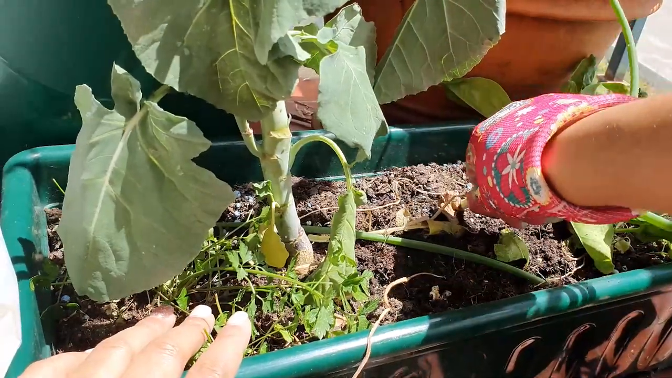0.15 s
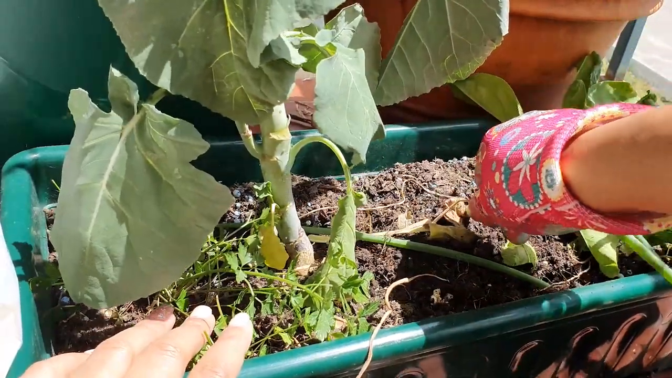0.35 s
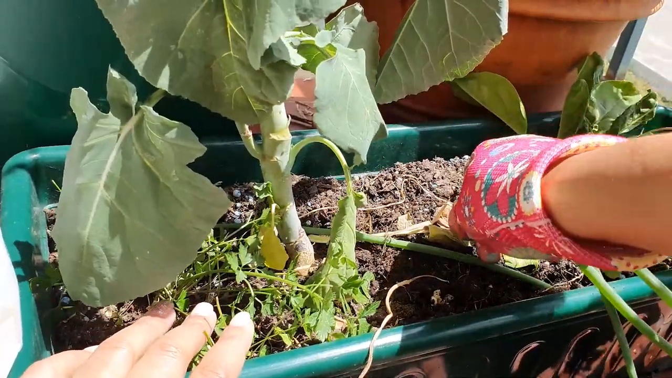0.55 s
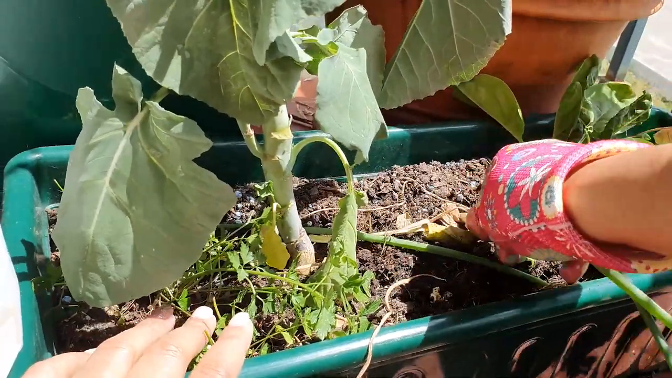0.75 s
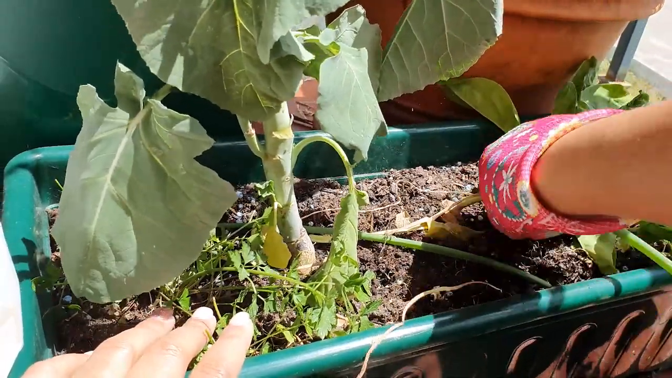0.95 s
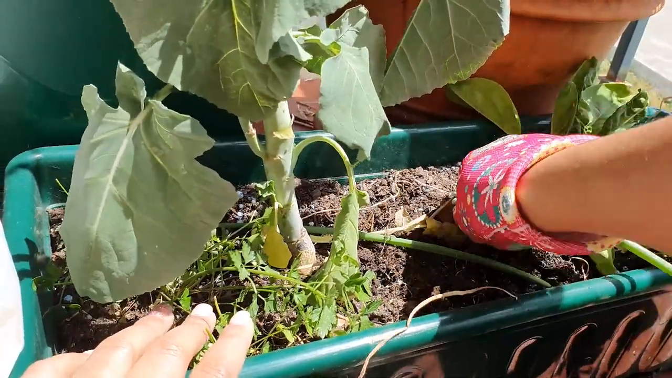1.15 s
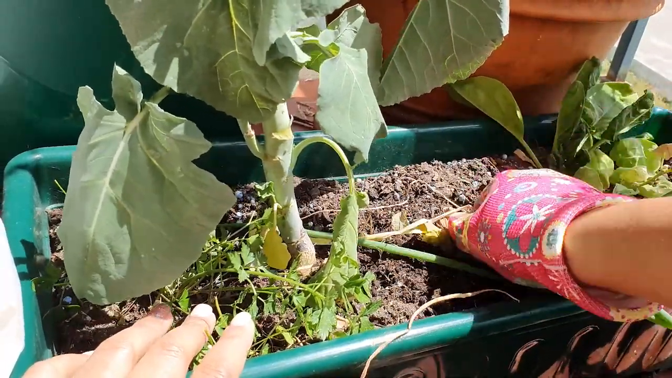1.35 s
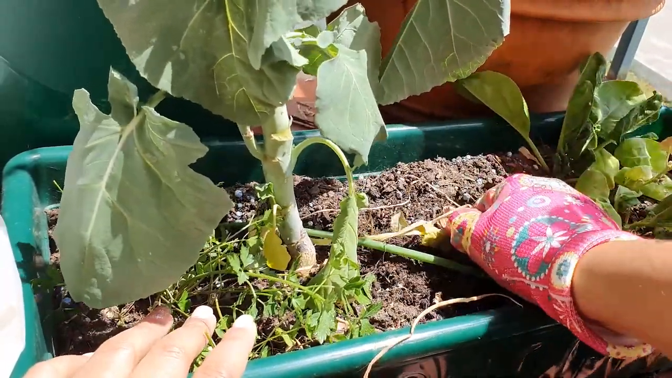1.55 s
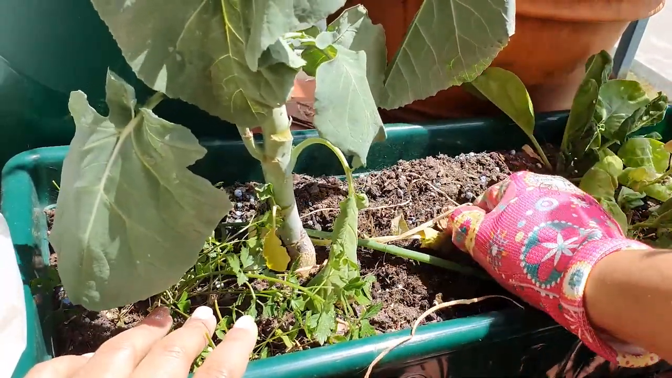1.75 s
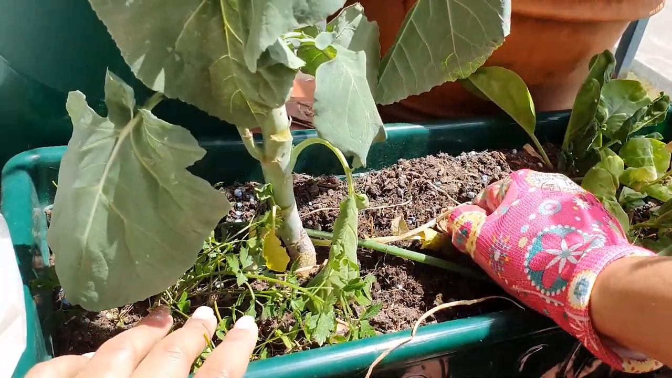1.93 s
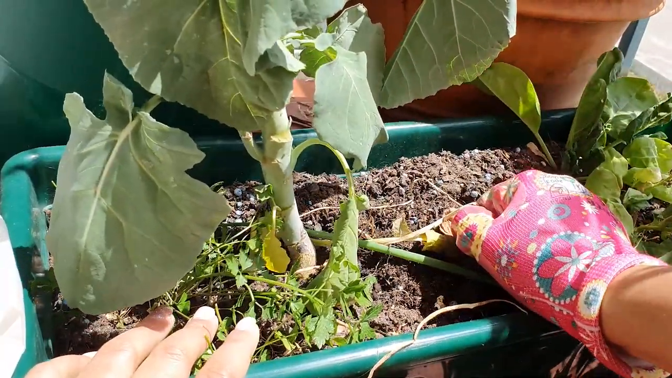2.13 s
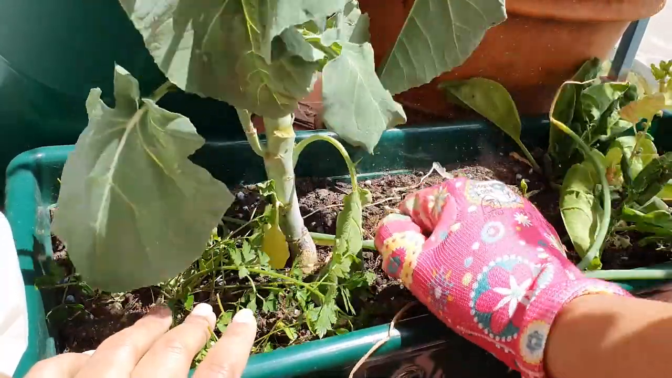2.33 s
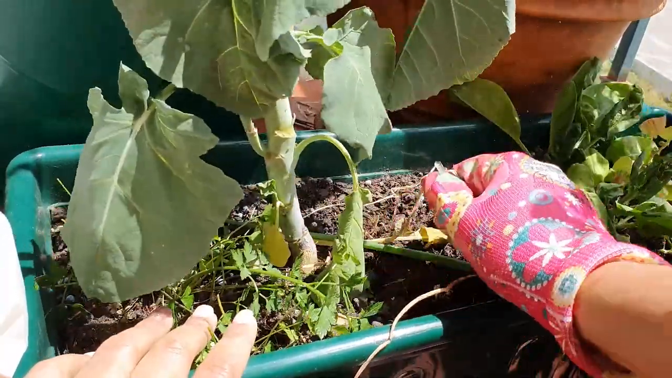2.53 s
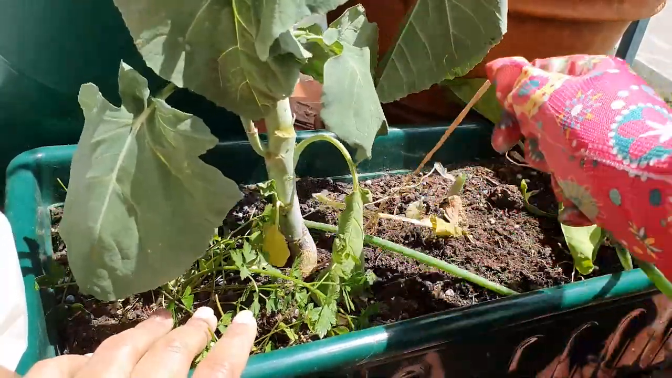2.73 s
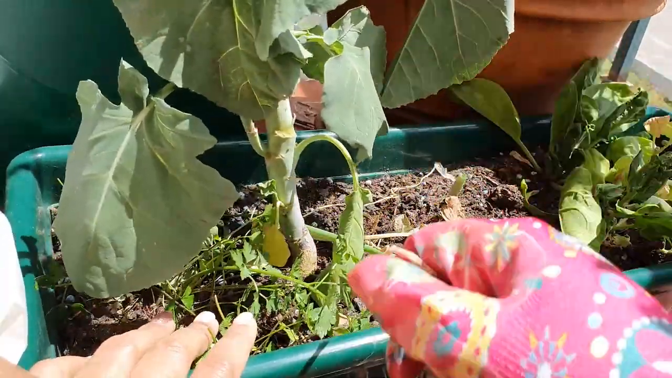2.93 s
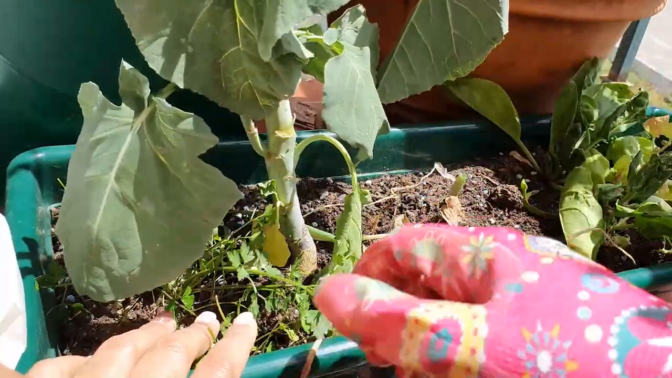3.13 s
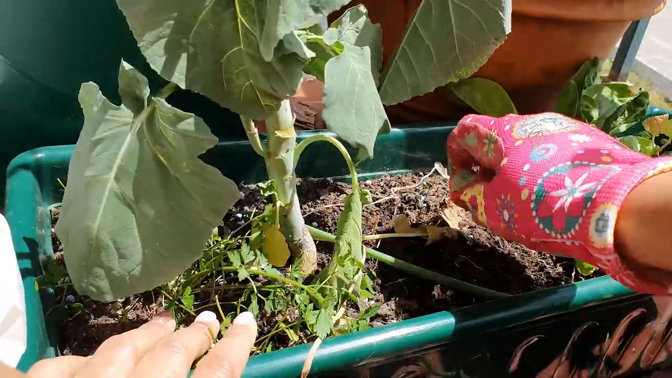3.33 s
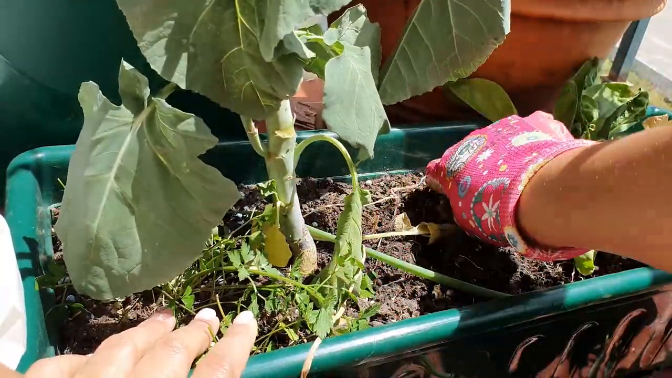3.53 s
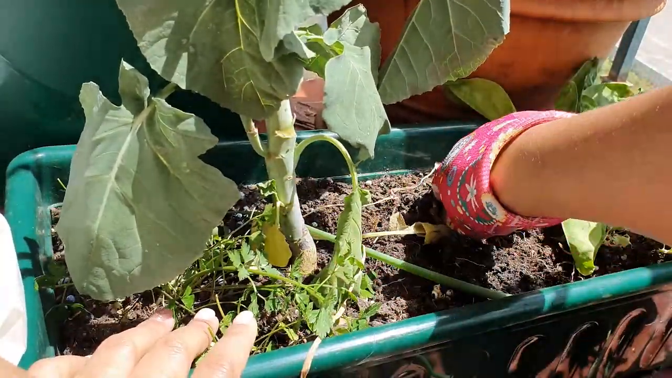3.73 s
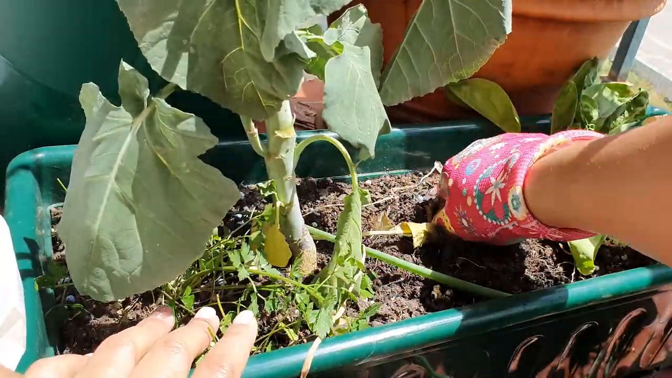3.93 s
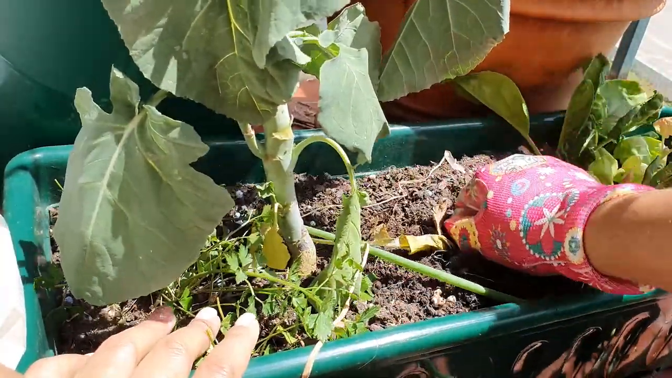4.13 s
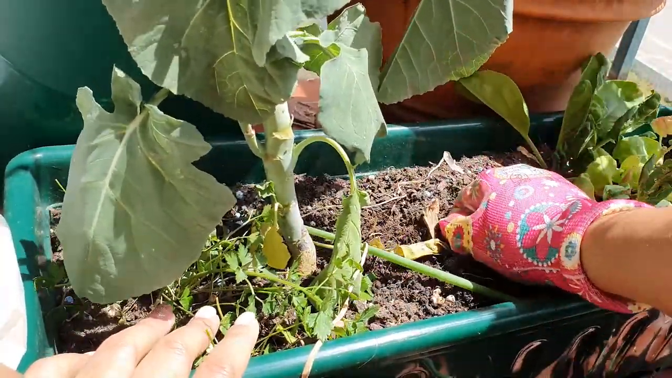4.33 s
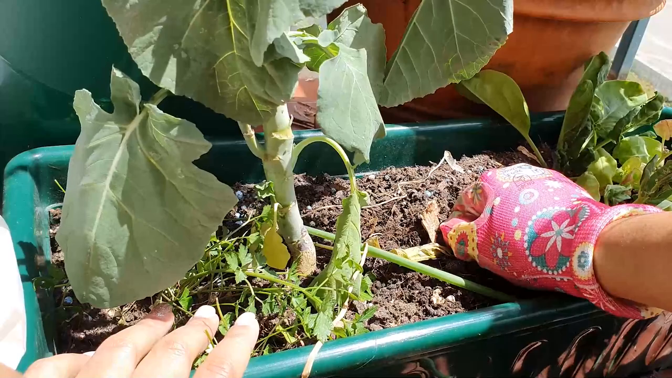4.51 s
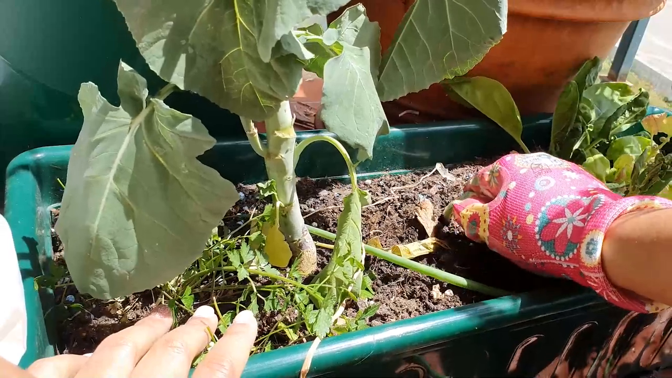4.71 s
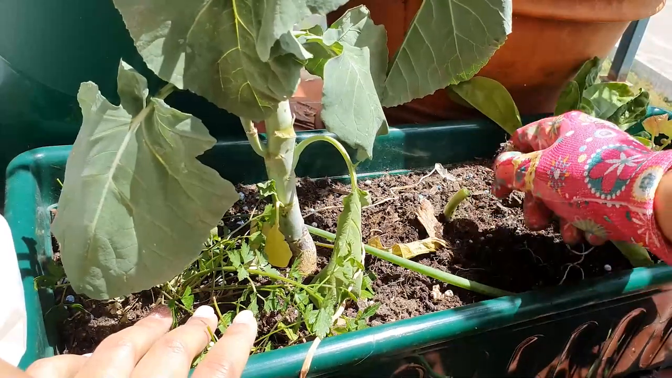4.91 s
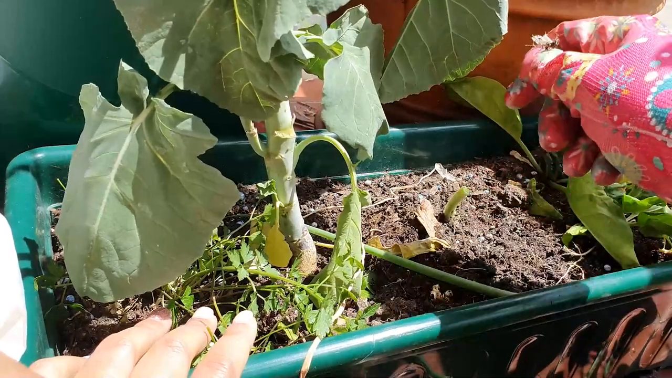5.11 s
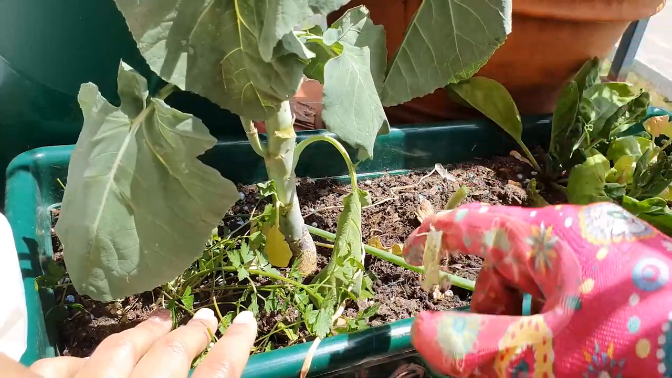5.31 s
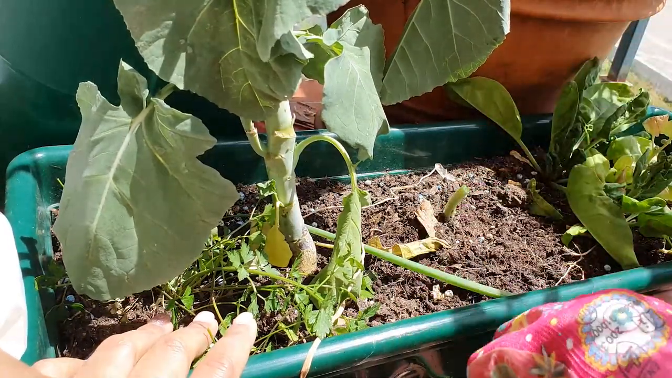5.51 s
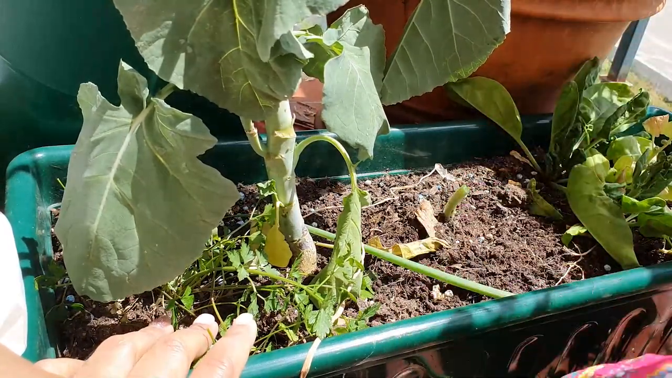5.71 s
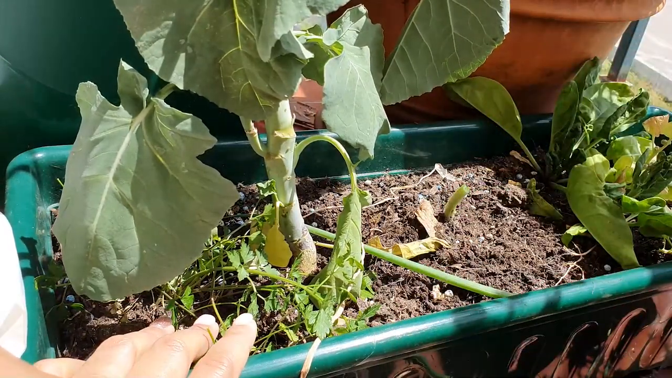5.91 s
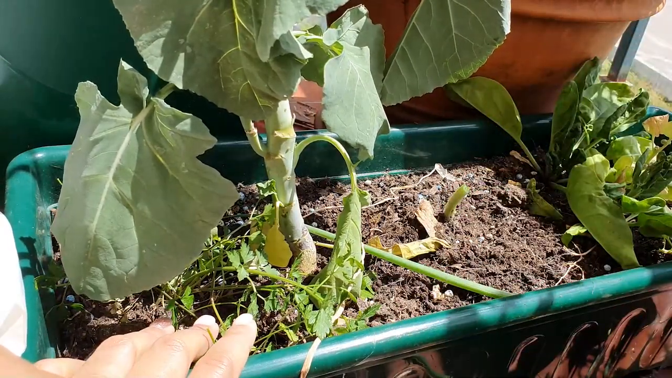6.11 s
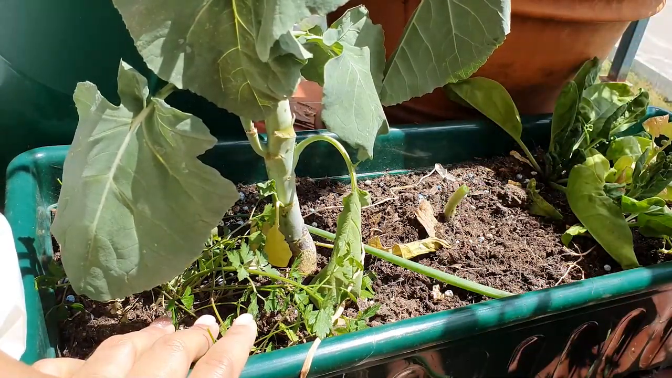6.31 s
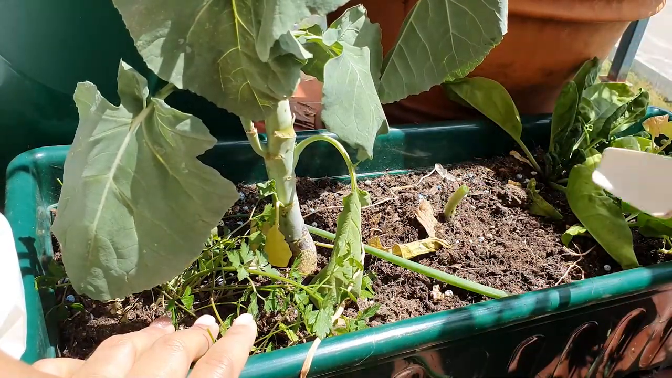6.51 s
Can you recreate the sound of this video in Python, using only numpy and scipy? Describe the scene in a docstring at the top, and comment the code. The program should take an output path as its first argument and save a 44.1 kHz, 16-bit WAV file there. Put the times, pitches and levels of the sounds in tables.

```python
"""From the start a gloved hand rubs soil and dry litter in a plastic planter: clumps of tiny noise grains.
Air rumbles as low noise, and small breaks tick as noise bursts, amid gliding sparrow whistles.
A sharp snap and recoiling stems, made as fading swings, come next; then a dove coos in slow glides.
A stalk then snaps and tears out with a thud in a run of grains; the planter rings and walls echo.
The glove squeaks in wavering whistles, twigs break later, and the dove calls again near the end."""
import sys
import numpy as np
from scipy import signal
from scipy.fft import rfft, irfft
from scipy.io import wavfile

SR = 44100
rng = np.random.default_rng(int(sys.argv[2]) if len(sys.argv) > 2 else 0)


def store_pcm(level_fs):
    """Save levels as 16-bit WAV."""
    pcm = np.round(np.clip(level_fs, -1, 1) * 32767).astype(np.int16)
    wavfile.write(sys.argv[1], SR, np.atleast_2d(pcm).T)


N = 289296
TIME = np.arange(N) / SR  # seconds

# Levels in the tables are before the mixing gains used in the functions.
# strokes of the hand: [start t/s, length/s, soil level/dB, scraping level/dB, litter level/dB]
HAND_STROKES = [(0.0, .11, -48, -49, -48), (0.144, 0.27, -57, -58, -56), (0.411, 0.12, -54.5, -56, -51),
                (0.558, 0.27, -59.5, -59, -64), (0.713, 0.12, -50.5, -51, -49.5),
                (0.848, 0.12, -50.5, -53, -59.5), (1.077, 0.26, -58.5, -54, -56),
                (1.33, 0.21, -55, -60, -60), (1.525, 0.23, -59, -61.5, -70),
                (1.717, 0.43, -57.5, -61.5, -65.5), (2.293, 0.093, -46, -57.5, -61.5),
                (2.412, 0.08, -53, -58.5, -63.5), (3.038, 0.27, -78, -72, -65.5),
                (3.448, 0.25, -59.5, -63.5, -68), (3.785, 0.27, -59.5, -62, -66),
                (3.983, 0.2, -55.5, -60.5, -65), (4.203, 0.36, -61, -68, -74),
                (4.478, 0.41, -59.5, -61, -66.5), (5.195, .10, -58, -62, -65),
                (5.497, 0.052, -67, -55.5, -55.5), (5.619, 0.01, -81, -61, -52),
                (5.74, .02, -68, -61.5, -66.5), (5.809, 0.068, -61.5, -60.5, -62),
                (6.024, 0.12, -58, -60, -65), (6.191, 0.15, -65, -65, -62),
                (6.412, 0.11, -66.5, -67.5, -72)]
# a stroke builds up over this share of its length, holds, then dies away
STROKE_ATTACK_SHARE, STROKE_RELEASE_S = 0.28, 0.056
# soil and leaves keep settling between strokes: [soil level/dB, scraping level/dB, litter level/dB]
SETTLING_LEVELS = (-67, -72, -78)
SOIL_DB, SCRAPE_DB, LITTER_DB = 4, 2.5, 3
# where the glove rubs, positive is left: [t/s, left-right level/dB]
HAND_SIDE = [(0, -6), (0.12, -12), (0.2, -0.5), (3.3, 0), (5.4, -1), (5.6, 4), (5.8, 0.5), (6.56, 0)]
# tone of rubbed soil: [f/Hz, level per Hz/dB]
SOIL_SPECTRUM = [(120, 4.5), (250, 3.5), (450, 3), (700, -3), (1050, -1.5), (1500, -11.5), (2200, -20.5),
                 (4000, -35)]
# tone of the glove scraping leaves: [f/Hz, level per Hz/dB]
SCRAPE_SPECTRUM = [(900, -25.5), (1500, -0.5), (2000, -3), (2400, -1.5), (2900, -2), (3600, -2.5),
                   (5000, -14), (7000, -17.5), (10000, -25)]
# tone of crackling dry litter: [f/Hz, level per Hz/dB]
LITTER_SPECTRUM = [(1500, -30), (2700, 0.5), (4000, 9), (6300, 5), (7800, -3.5), (10000, 0), (13000, -5.5),
                   (15000, -10), (16000, -20.5)]
# how alike left and right are: [f/Hz, likeness from -1 to 1]
STEREO_LIKENESS = [(30, 0.17), (90, 1), (170, 0.91), (350, 0.87), (700, 0.31), (1400, -0.27), (2500, 0.12),
                   (16000, -0.046)]

# light air on the microphone: [t/s, level/dB]
AIR_STRENGTH = [(0, -44), (0.9, -39), (1.2, -56), (2.5, -52), (2.65, -75.5), (3.1, -56), (3.8, -61.5),
                (4.6, -49.5), (6.56, -51.5)]
# puffs of air on top of it: [start t/s, length/s, level/dB, left-right level/dB]
AIR_PUFFS = [(0.0, 0.041, -45, 7), (0.148, 0.034, -40, 12), (0.286, 0.075, -37, 9),
             (0.394, 0.22, -32.5, 14.5), (0.714, .10, -32.5, 9.5), (1.388, 0.11, -39.5, 13),
             (2.233, 0.13, -41.5, 4), (2.95, 0.045, -46, 5), (3.175, 0.024, -42, 7),
             (4.389, 0.048, -44.5, 13), (5.049, 0.076, -39, 13), (5.25, 0.053, -49, 7),
             (6.382, 0.16, -44.5, -8)]
# tone of the air rumble: [f/Hz, level per Hz/dB]
RUMBLE_SPECTRUM = [(20, -14), (40, -3), (60, 8.5), (85, 1.5), (130, -8), (220, -16.5), (500, -61)]
# tone of the steady hush outdoors: [f/Hz, level per Hz/dB]
OUTDOOR_SPECTRUM = [(20, -32), (50, 0.5), (62, 3), (100, -11.5), (200, -6.5), (300, -24.5), (450, -18),
                    (1000, -26), (2000, -41), (3200, -26.5), (4200, -28.5), (5200, -30), (8000, -45.5),
                    (15000, -52)]
PUFF_ATTACK_SHARE, PUFF_RELEASE_S = 0.4, 0.027
AIRFLOW_PAN_DB, BREEZE_DB, OUTDOORS_DB = 4.5, -0.5, -54.5

# stalks, twigs and crumbs breaking: [t/s, level/dB, woody body level/dB, sharp edge level/dB]
BREAKS = [(0.0908, -46, 6, -3), (0.1757, -41, -3.5, -8.5), (0.4957, -21.5, -16, -6.5),
          (0.707, -44, -2.5, -1.5), (0.7237, -38.5, -10, -5), (0.7564, -40, 0, 0), (0.7695, -44, 4, 0),
          (0.7945, -38, 6, -2.5), (0.899, -46.5, 3, -12), (1.7902, -44.5, -15, -5.5),
          (1.8187, -42.5, -7, -7.5), (1.854, -45.5, 1, 0.5), (1.9378, -47, -5, -4), (2.01, -46.5, -3, -7),
          (2.2089, -17, -5.5, -10), (2.2536, -21.5, 7, -5.5), (2.271, -20, -5, -10),
          (2.2782, -27, 3, -22.5), (2.289, -21, -9, -9.5), (2.3129, -35, 7, -3), (3.13, -49.5, -14, -11),
          (3.2006, -35, -14, 4), (3.3185, -42, -4.5, 2), (4.131, -42, -2.5, -3.5), (4.6534, -43, 13.5, -3),
          (4.6704, -27, 7.5, -0.5), (4.7395, -38, 4, -11), (5.261, -37.5, -11, -17),
          (5.51, -44.5, -2.5, -15.5)]
CRACK_T60_S, CRACK_PAN_DB = 0.025, 1  # time to fade by 60 dB; shift to the left of the hand
# echoes off the planter walls and the pot behind: [delay/s, level/dB]
NEAR_WALLS = [(.0009, -24.5), (.0023, -27.5), (.0058, -19)]
# ringing tones of the plastic planter: [f/Hz, level/dB, time to fade by 60 dB/s]
PLANTER_TONES = [(186.6, -3, 0.13), (296, -10, 0.26), (424, -7, 0.2), (639, -4, 0.19), (970, -6.5, 0.053),
                 (1220, -14.5, 0.029), (1640, -14.5, 0.066), (2160, -16.5, 0.2), (2490, -14, 0.17)]
TERRACE_DB, TERRACE_T60_S = -16.5, 0.25
FAR_WALL_S, FAR_WALL_DB = 0.087, -19

# the nearer sparrows: [t/s, start f/Hz, end f/Hz, level/dB]
SPARROW_CHIRPS = [(0.1, 3850, 4710, -45.5), (0.55, 4750, 3970, -49.5), (0.6, 3610, 3710, -47.5),
                  (0.931, 3150, 2966, -53.5), (0.97, 3210, 4380, -52), (1.611, 3220, 3290, -49.5),
                  (1.64, 3900, 4126, -44.5), (3.336, 3775, 3620, -51), (3.421, 4100, 4320, -53),
                  (3.97, 3090, 3546, -51), (4.06, 3180, 4080, -48), (4.13, 4500, 4410, -50),
                  (4.31, 4280, 3990, -50), (4.355, 3820, 3440, -50.5), (4.784, 4180, 4444, -46.5),
                  (4.83, 3490, 3300, -51), (5.119, 4700, 4690, -61.5), (5.8, 3230, 3765, -48.5),
                  (5.82, 4710, 4440, -55), (5.87, 3500, 3710, -57.5), (6.18, 4410, 3550, -55.5),
                  (6.439, 3830, 3570, -55.5), (6.52, 5180, 5500, -60)]
CHIRP_S = 0.045
# replies from the flock: longest wait, pitch scatter as a share, level against the chirp
REPLY_WITHIN_S, REPLY_SCATTER, REPLY_DB = 0.095, 0.2, -10.5

# stems and root ball recoiling: [t/s, height of swing/dB, f/Hz]
STEM_RECOILS = [(0.5, -27.5, 294), (0.7942, -10, 190), (0.795, -14.5, 328), (0.928, -32.5, 387),
                (1.718, -28.5, 230), (1.937, -30.5, 340), (2.01, -34, 345), (2.209, -3, 2700),
                (2.2119, -9.5, 210), (2.2452, -13.5, 1340), (2.2468, -2.5, 1980), (2.2525, -5, 1020),
                (2.2565, 0, 245), (2.2575, -10, 480), (2.2693, -13, 334), (2.27, -3.5, 3236),
                (4.289, -38.5, 456), (4.6703, -21, 1050), (4.6708, -14.5, 2130), (4.672, -24, 243)]
# thin, high stems stop sooner: fade time at 1 kHz and how fast it falls with pitch
RECOIL_T60_S, RECOIL_T60_SLOPE = 0.015, 0.4

# dove coos: [t/s, length/s, start f/Hz, end f/Hz, level/dB]
DOVE_COOS = [(0.95, 0.23, 387, 360, -68), (1.8, 0.24, 379.5, 387, -63.5), (6.0, 0.089, 411.5, 375, -59),
             (6.05, 0.14, 364.5, 382, -57)]

# roots tearing and short scuffs of the glove: [t/s, length/s, level/dB]
ROOT_TEARS = [(2.201, 0.086, -28), (2.265, 0.036, -21.5), (2.296, 0.04, -39), (4.648, 0.02, -32),
              (5.498, 0.031, -49), (5.627, 0.041, -45.5)]
# tone of tearing roots: [f/Hz, level per Hz/dB]
ROOT_SPECTRUM = [(150, -1), (400, 0), (650, -7), (1000, -3), (1500, -6.5), (2200, -1.5), (3200, -3.5),
                 (4500, -13.5), (6500, -12), (8000, -20.5), (16000, -16.5)]

# the glove squeaks on stems: [t/s, length/s, start f/Hz, end f/Hz, level/dB]
GLOVE_SQUEAKS = [(3.49, 0.23, 2016, 1950, -65), (5.505, 0.032, 2262, 2232, -53.5),
                 (5.62, 0.058, 2130, 2065, -52.5)]

CUTOFF_HZ = 15900


def from_db(db):
    """Turn decibels into gain."""
    return 10 ** (np.asarray(db) / 20)


def rms_one(x):
    """Scale a sound to an average power of one."""
    return x / np.sqrt(np.mean(x ** 2) + 1e-20)


def in_time(rows):
    """Read each column of a curve at every sample."""
    s, *columns = np.transpose(rows)
    return [np.interp(TIME, s, column) for column in columns]


def at_hz(points, hz):
    """Read a curve at any pitch, with pitch spaced as the ear hears it."""
    point_hz, values = np.transpose(points)
    return np.interp(np.log(hz + 1), np.log(point_hz), values)


def band(x, low_hz, high_hz, order=2):
    """Keep only the sound between two pitches."""
    edges = [low_hz, min(high_hz, 0.45 * SR)]
    sos = signal.butter(order, edges, "band", fs=SR, output="sos")
    return signal.sosfilt(sos, x + 1e-18)


def add(out, s, sound):
    """Mix a short sound in at time s."""
    start = min(max(round(s * SR), 0), N)
    out[..., start:start + sound.shape[-1]] += sound[..., :N - start]


def delayed(x, s):
    """Give the same sound s seconds later."""
    return np.pad(x, [(0, 0), (round(s * SR), 0)])[:, :N]


def panned(db):
    """Give left and right gains for a level difference; positive is left."""
    return from_db(db * np.array([[0.5], [-0.5]]))


def drift(rate):
    """Wander smoothly by chance, with a new target rate times a second."""
    return rms_one(np.interp(TIME * rate, np.arange(N), rng.standard_normal(N)))


def envelope(s, length, attack_share, release_s):
    """Rise from time s, hold until the length is over, then die away."""
    t = TIME - s
    rise = np.clip(t / (length * attack_share), 0, 1)
    return rise * np.exp(-np.maximum(t - length, 0) / release_s)


def colour(pair, spectrum):
    """Shape two unrelated signals into stereo with a given tone and likeness, at rms 1."""
    hz = np.arange(N // 2 + 1) * SR / N
    alike = np.clip(at_hz(STEREO_LIKENESS, hz), -1, 1)
    mid, side = rfft(pair) * from_db(at_hz(spectrum, hz))
    opposite = [[1], [-1]]
    return rms_one(irfft(np.sqrt(1 + alike) * mid + np.sqrt(1 - alike) * side * opposite, N))


def grains(per_s, spread_db, grain_s):
    """Make tiny fractures of uneven size, each a fading puff of noise at both microphones."""
    sizes = from_db(spread_db * np.minimum(rng.exponential(1, N), 4))
    sizes = sizes * (rng.random(N) < per_s / SR)
    power = signal.lfilter([1], [1, -np.exp(-2 / (grain_s * SR))], sizes ** 2 + 1e-12)
    return np.sqrt(power) * rng.standard_normal((2, N))


def calls(notes, waver, waver_rate):
    """Make gliding whistles with a wavering pitch, each swelling and fading."""
    out, wobble = np.zeros(N), 1 + waver * drift(waver_rate)
    for s, length, start_hz, end_hz, db in notes:
        along = np.linspace(0, 1, int(length * SR))
        glide = start_hz + (end_hz - start_hz) * along
        hz = glide * np.roll(wobble, -int(s * SR))[:len(along)]
        whistle = np.sin(2 * np.pi * np.cumsum(hz) / SR)
        add(out, s, from_db(db) * 2 * np.sin(np.pi * along) * whistle)
    return out


def stroke_gains():
    """Add the power of strokes to the settling, for soil, glove and litter."""
    power = from_db(SETTLING_LEVELS)[:, None] ** 2
    for s, length, soil_db, scrape_db, litter_db in HAND_STROKES:
        shape = envelope(s, length, STROKE_ATTACK_SHARE, STROKE_RELEASE_S)
        power = power + np.outer(from_db([soil_db, scrape_db, litter_db]), shape) ** 2
    return np.sqrt(power)


def rummaging():
    """Damp soil rubs in dense grains, the glove scrapes leaves, litter crackles and crumbs tick."""
    on_soil, on_leaves, on_litter = stroke_gains()
    pan_db, = in_time(HAND_SIDE)
    # the glove catches and slips, so its grains come in clumps
    catching = rms_one(from_db(2 * drift(90)))
    rubbed = grains(per_s=2400, spread_db=3.5, grain_s=0.003)
    soil = on_soil * from_db(SOIL_DB) * colour(rubbed, SOIL_SPECTRUM)
    scraped = grains(per_s=2400, spread_db=2, grain_s=0.0038)
    scrape = on_leaves * from_db(SCRAPE_DB) * catching * colour(scraped, SCRAPE_SPECTRUM)
    crumbs = grains(per_s=60, spread_db=3, grain_s=0.0009)
    crackle = grains(per_s=2400, spread_db=3, grain_s=0.0015)
    crisp = rms_one(crackle) + 0.65 * rms_one(crumbs)
    litter = on_litter * from_db(LITTER_DB) * colour(crisp, LITTER_SPECTRUM)
    return (soil + scrape + litter) * panned(pan_db)


def air():
    """Low noise swells in puffs, each harder on one microphone, over a steady outdoor hush."""
    flow_db, = in_time(AIR_STRENGTH)
    power = (from_db(flow_db) * panned(AIRFLOW_PAN_DB)) ** 2
    for s, length, db, pan_db in AIR_PUFFS:
        shape = envelope(s, length, PUFF_ATTACK_SHARE, PUFF_RELEASE_S)
        power = power + (from_db(db) * panned(pan_db) * shape) ** 2
    breeze = colour(rng.standard_normal((2, N)), RUMBLE_SPECTRUM)
    hush = colour(rng.standard_normal((2, N)), OUTDOOR_SPECTRUM)
    return np.sqrt(power) * from_db(BREEZE_DB) * breeze + from_db(OUTDOORS_DB) * hush


def burst(noise, fade, low_hz, high_hz):
    """Make a fading band of noise with rms 1 over its first 4 ms."""
    sound = band(noise * fade, low_hz, high_hz)
    return sound / np.sqrt(np.mean(sound[:, :SR // 250] ** 2))


def cracks(body_db, core_db, edge_db, fizz_db, body_width, spike_db, spike_s):
    """A break spikes and dies in milliseconds; thick stalks have more body, dry twigs more edge."""
    t, out = TIME[:SR // 12], np.zeros((2, N))
    fade = from_db(-60 * t / CRACK_T60_S) + from_db(spike_db) * np.exp(-t / spike_s)
    for s, db, woody_db, sharp_db in BREAKS:
        pan_db = CRACK_PAN_DB + np.interp(s, *np.transpose(HAND_SIDE))
        noise = rng.standard_normal((3, len(t)))
        # noise shared by both sides keeps the body and core near the middle
        wide_body = noise[2] + body_width * noise[:2]
        wide_core = noise[:2] + 0.38 * noise[2]
        body = from_db(body_db + woody_db) * burst(wide_body, fade, low_hz=570, high_hz=2180)
        core = from_db(core_db) * burst(wide_core, fade, low_hz=2500, high_hz=4470)
        edge = from_db(edge_db + sharp_db) * burst(noise[::-1][:2], fade, low_hz=5370, high_hz=6670)
        fizz = from_db(fizz_db + sharp_db) * burst(noise[:2], fade, low_hz=9000, high_hz=12400)
        add(out, s, (body + core + edge + fizz) * from_db(db) * panned(pan_db))
    return out


def in_planter(x):
    """Close reflections give a sound a slightly hollow colour."""
    return x + sum(from_db(db) * delayed(x, s) for s, db in NEAR_WALLS)


def planter(x, ring_db):
    """The plastic walls ring on after each jolt, one resonance per tone."""
    out = 0
    for k, (hz, db, t60) in enumerate(PLANTER_TONES):
        r = from_db(-60 / (t60 * SR))  # what is left of the ringing after one sample
        push = np.array([1, 0, -1]) * (1 - r * r) / 2
        swing = [1, -2 * r * np.cos(2 * np.pi * hz / SR), r * r]
        # neighbouring tones push in opposite directions
        out = out + (-1) ** k * from_db(db + ring_db) * signal.lfilter(push, swing, x + 1e-18)
    return out


def terrace(x, t60, dull_hz):
    """Scattered echoes between the walls build up and fade; the treble dies sooner."""
    t = TIME[:SR]
    noise = rng.standard_normal((2, SR))
    low = band(noise, 120, dull_hz, order=1)
    lasting = low * from_db(-60 * t / t60)
    brief = 0.5 * (noise - low) * from_db(-90 * t / t60)
    tail = (lasting + brief) * (1 - np.exp(-t / 0.0045))
    tail = tail / np.sqrt(np.sum(tail ** 2) / 2)
    return signal.fftconvolve(np.atleast_2d(x), tail, axes=1)[:, :N]


def chatter():
    """Four fainter replies follow each chirp by chance, gliding between pitches near its last one."""
    replies = []
    for s, _, hz, db in SPARROW_CHIRPS:
        for wait, first, last in rng.random((4, 3)):
            start_hz = hz * (1 + REPLY_SCATTER * (2 * first - 1))
            end_hz = hz * (1 + REPLY_SCATTER * (2 * last - 1))
            replies.append((s + REPLY_WITHIN_S * wait, start_hz, end_hz, db + REPLY_DB))
    return replies


def sparrows():
    """Short whistles flutter quickly in pitch and level and echo between the walls."""
    chirps = list(SPARROW_CHIRPS) + chatter()
    notes = [(s, CHIRP_S, start_hz, end_hz, db) for s, start_hz, end_hz, db in chirps]
    flutter = rms_one(from_db(2 * drift(110)))
    direct = calls(notes, waver=0.035, waver_rate=420) * flutter
    return from_db(-6.5) * (direct + 0.8 * terrace(direct, t60=0.38, dull_hz=5960))


def recoils(rise_cycles):
    """What is pulled taut and let go swings in a quickly fading tone."""
    t, out = TIME[:SR // 4], np.zeros(N)
    for s, db, hz in STEM_RECOILS:
        t60 = RECOIL_T60_S * (1000 / hz) ** RECOIL_T60_SLOPE
        rise = 1 - np.exp(-t * hz / rise_cycles)
        add(out, s, from_db(db - 60 * t / t60) * rise * np.sin(2 * np.pi * hz * t))
    return out


def from_the_side(x, lag_s):
    """The sound reaches the right microphone a little before the left."""
    return np.array([np.interp(TIME - lag_s, TIME, x), x])


def dove():
    """Low, slowly gliding coos waver gently in pitch."""
    return from_db(4.0) * calls(DOVE_COOS, waver=0.022, waver_rate=33)


def tearing():
    """Many fibres part in a quick run that swells and fades."""
    effort = np.zeros(N)
    for s, length, db in ROOT_TEARS:
        along = np.clip((TIME - s) / length, 0, 1)
        effort += from_db(db) * np.sqrt(np.maximum(np.sin(np.pi * along), 0))
    fibres = grains(per_s=2500, spread_db=4.5, grain_s=0.0015)
    return effort * colour(fibres, ROOT_SPECTRUM)


def squeaks():
    """The glove squeaks on stems; a fast waver in pitch makes the tone hoarse."""
    return calls(GLOVE_SQUEAKS, waver=0.095, waver_rate=980)


def scene():
    """Mix the work in the planter, its echoes, the birds and the open air."""
    breaks = cracks(body_db=-3.0, core_db=-2.5, edge_db=-3.5, fizz_db=-3.0,
                    body_width=0.24, spike_db=-1.0, spike_s=0.00077)
    swings = from_the_side(recoils(rise_cycles=0.16), lag_s=0.00011)
    jolts = in_planter(breaks + tearing()) + swings
    near = jolts + planter(jolts, ring_db=5.5)
    echoes = from_db(TERRACE_DB) * terrace(near, t60=TERRACE_T60_S, dull_hz=3480)
    far_echo = from_db(FAR_WALL_DB) * delayed(band(near, 150, 420), FAR_WALL_S)
    glove = in_planter(rummaging()) + squeaks()
    return near + echoes + far_echo + glove + sparrows() + dove() + air()


def record(dry):
    """The microphone loses the deepest bass, peaks stop at full scale and the top is cut."""
    bass_cut = signal.butter(2, 28, "high", fs=SR, output="sos")
    top_cut = signal.ellip(10, 0.2, 80, CUTOFF_HZ, fs=SR, output="sos")
    heard = signal.sosfilt(bass_cut, dry)
    return signal.sosfilt(top_cut, np.clip(heard, -1, 1))


dry = scene()
out = record(dry)
store_pcm(out)
```